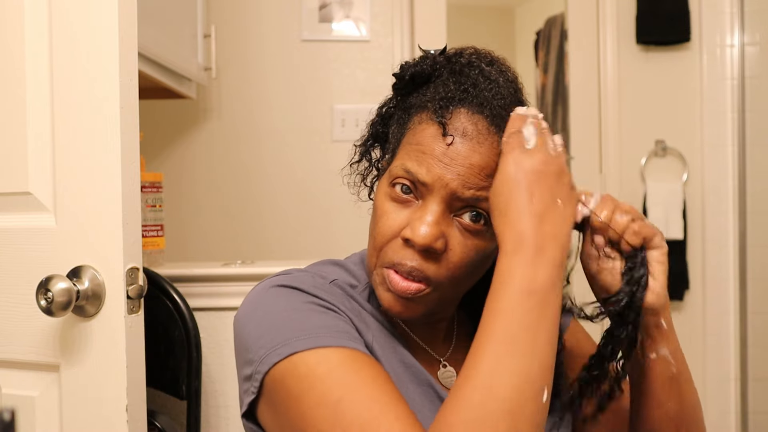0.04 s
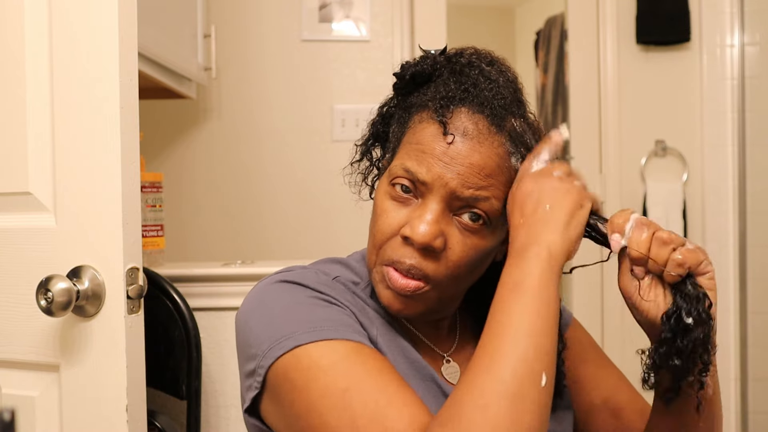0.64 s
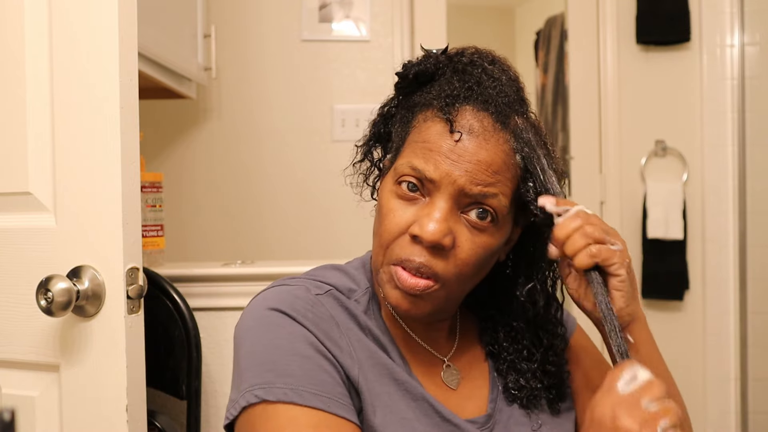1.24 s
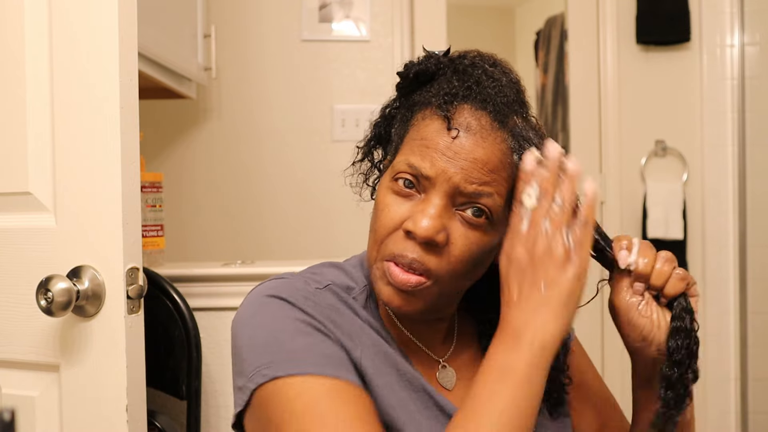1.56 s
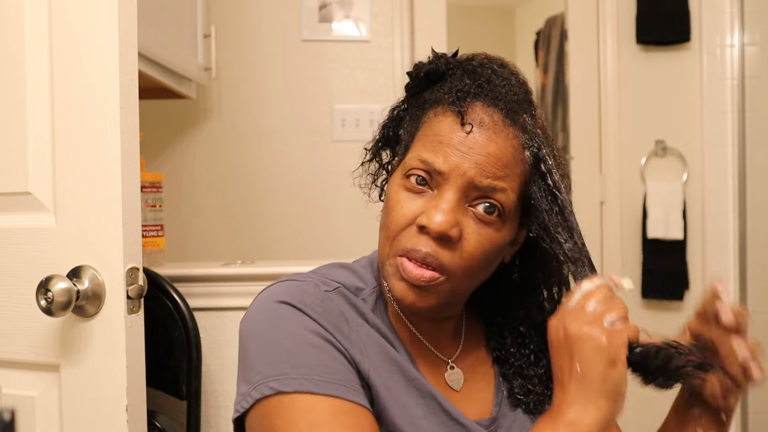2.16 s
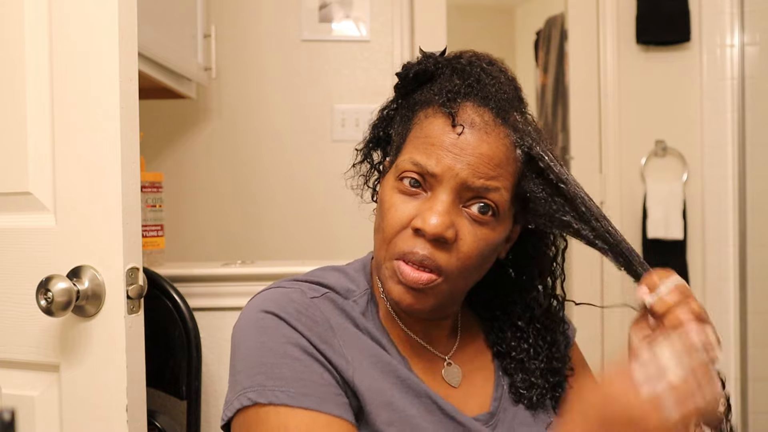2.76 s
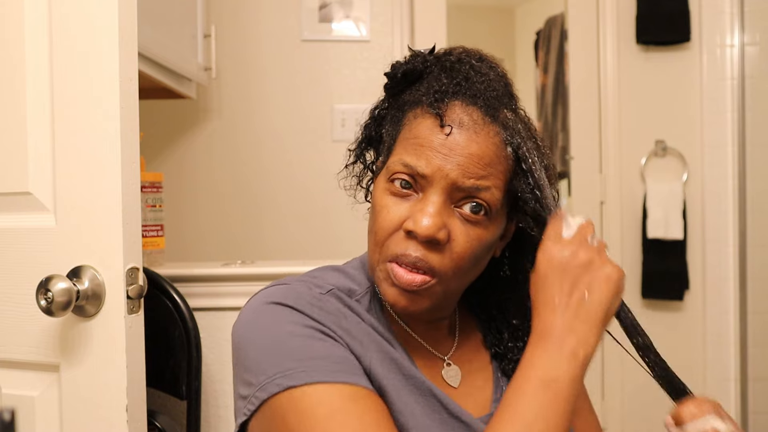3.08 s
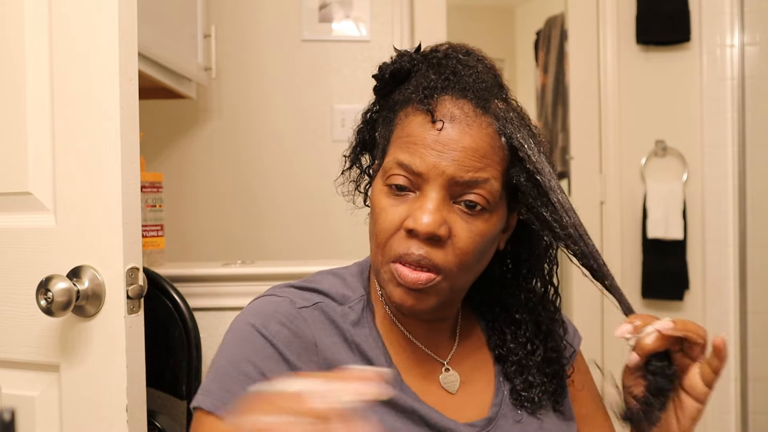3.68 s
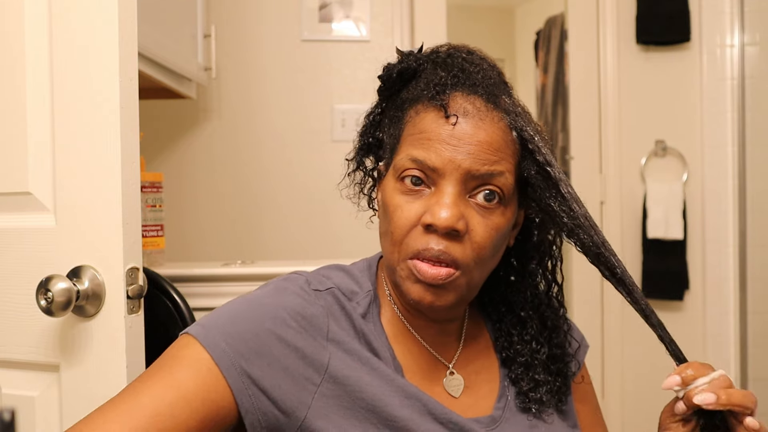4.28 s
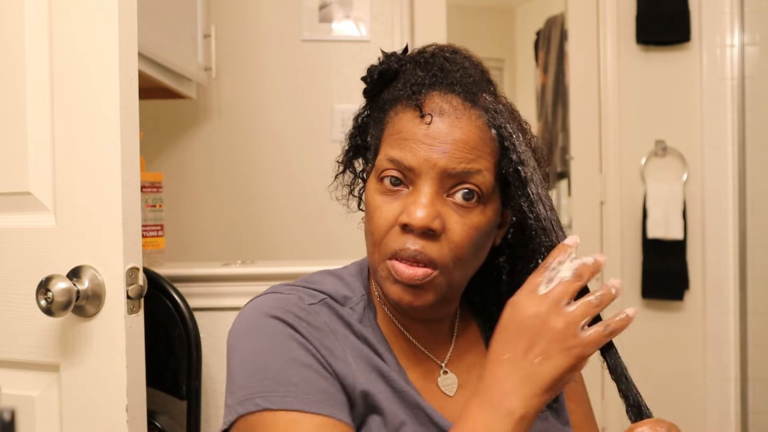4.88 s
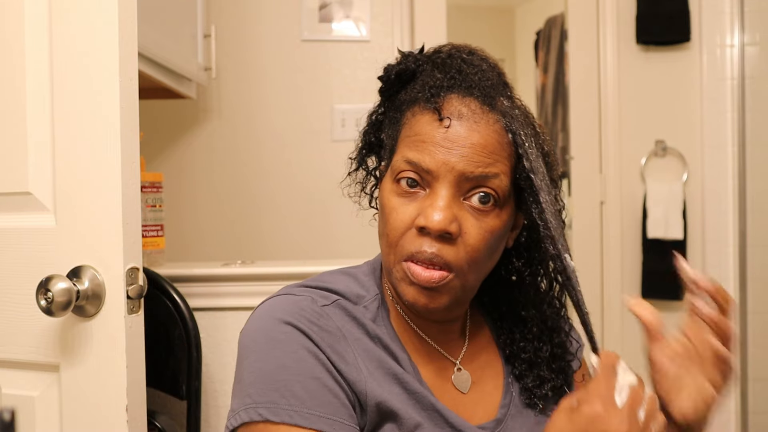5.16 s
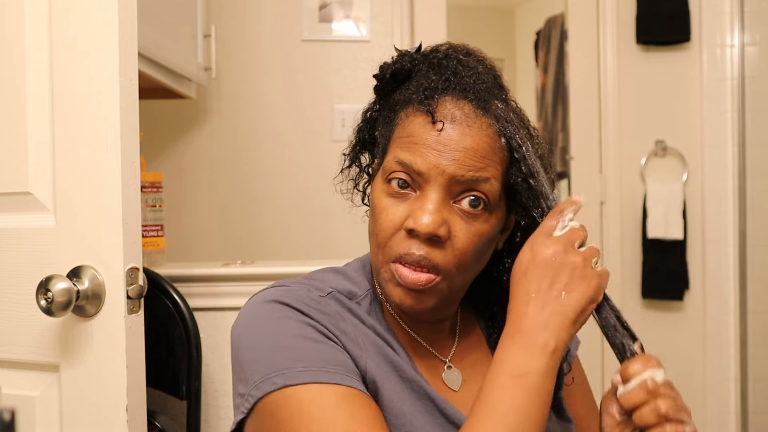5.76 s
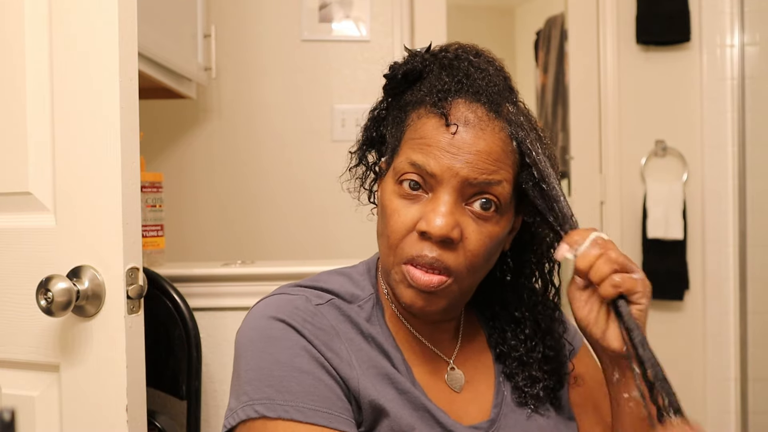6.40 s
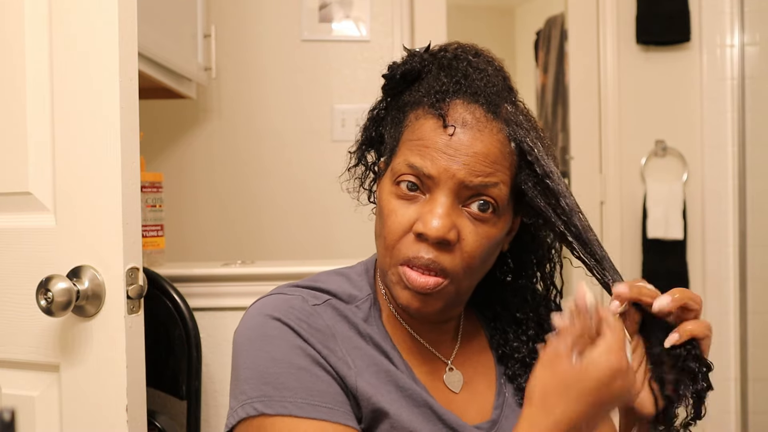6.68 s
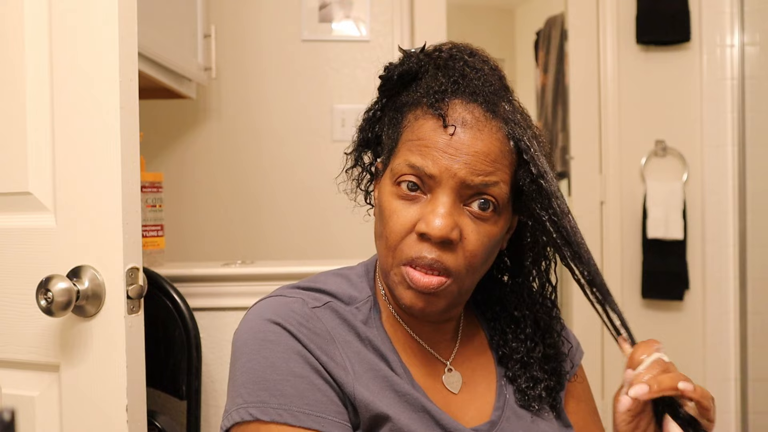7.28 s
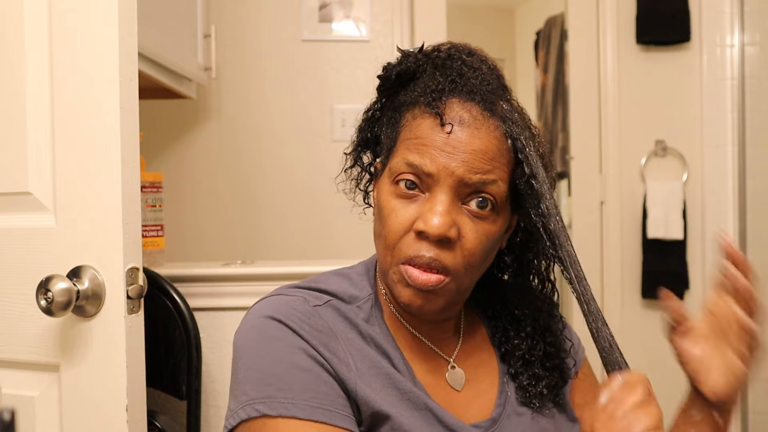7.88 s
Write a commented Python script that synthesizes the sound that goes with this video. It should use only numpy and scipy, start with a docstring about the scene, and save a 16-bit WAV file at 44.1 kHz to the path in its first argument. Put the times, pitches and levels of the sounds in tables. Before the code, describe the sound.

Soft swishes and squishes come from nearby as fingers slide down wet, cream-coated hair, now and then making a small sticky click. They ease off while a plastic container bumps the counter several times with hollow clacks and thuds, then start again. Ventilation murmurs throughout in the short echo of a small bathroom, and a faint low drone, like an engine outside, grows louder at the close.

```python
"""A small bathroom murmurs with ventilation and a faint, low drone, like an engine outside.
From the start, hands pull conditioner through wet hair: strands hiss, tiny bubbles burst, and now
and then cream snaps between the fingers or skin squeaks on the lock. At about 4 s the pulling stops
and a plastic container scrapes and knocks on the counter. After 5 s the pulling starts again,
and from about 7 s to the end the drone swells."""
import sys
import numpy as np
from scipy import signal
from scipy.fft import rfft, irfft, next_fast_len
from scipy.io import wavfile
from scipy.ndimage import map_coordinates

SR = 44100
rng = np.random.default_rng(int(sys.argv[2]) if len(sys.argv) > 2 else 0)


def file_out(sig):
    """Save sig as 16-bit WAV at sys.argv[1]."""
    # one column per channel
    cols = np.atleast_2d(sig).T
    # limit, then scale
    lim = np.clip(cols, -1, 1)
    pcm = np.round(lim * 32767).astype(np.int16)
    wavfile.write(sys.argv[1], SR, pcm)


N = 350154

# Tone of the moving air in mid (what both ears share) and side (how they differ): pitch_hz, gain_db
AIR_MID_TONE = [(20, -44), (27, 7.5), (40, -14), (70, -0.5), (100, 2), (150, -8), (270, -9), (420, -13),
                (1000, -16), (2000, -20.5), (3400, -24), (6000, -30), (12000, -44), (14500, -70)]
AIR_SIDE_TONE = [(20, -32), (100, -17), (200, -7.5), (400, -5.5), (900, -8), (1500, -10.5), (2200, -12.5),
                 (3400, -16), (6000, -21), (12000, -33), (14500, -36)]
# The drone, which holds the first row from the start: time_s, pitch_hz, level_db
DRONE_PATH = [(6.2, 68, -56.5), (6.45, 68.6, -57), (7.1, 71.15, -52), (7.16, 70.8, -44), (7.25, 76.5, -41),
              (7.3, 79.8, -50), (7.41, 82.8, -50), (7.47, 82.6, -44.5), (7.58, 84.7, -40.5),
              (7.75, 82.3, -44.5), (7.9, 80.4, -41)]

# Pulls of the fist along the hair:
# start_s, length_s, squish_db, hiss_db, hollow_pitch_hz, bubble_spread_octaves
PULLS = [(0, 0.034, -60.5, -66.5, 2900, 0.45), (0.104, 0.036, -54, -62.5, 4100, 0.14),
         (0.312, 0.018, -74, -57.5, 3020, 0.33), (0.612, 0.056, -60, -85.5, 4300, 0.14),
         (0.896, 0.1, -53, -57, 3210, 0.32), (1.063, 0.053, -51, -59, 2950, .36),
         (1.263, 0.11, -61.5, -63, 2830, 0.35), (1.434, 0.034, -54.5, -59.5, 3060, 0.34),
         (1.803, 0.13, -63.5, -63, 2660, 0.26), (2.083, 0.083, -55.5, -57, 3390, 0.3),
         (2.232, 0.083, -55.5, -59, 3430, 0.21), (2.43, 0.19, -57, -62.5, 2900, 0.23),
         (2.733, 0.11, -52.5, -60.5, 3140, 0.22), (2.9, 0.025, -54.5, -61.5, 2910, 0.3),
         (3.123, 0.11, -57.5, -64.5, 2650, 0.27), (3.246, 0.098, -51.5, -54.5, 3400, 0.36),
         (3.583, 0.032, -59.5, -58.5, 3740, 0.42), (5.154, 0.26, -59, -59.5, 3100, 0.32),
         (5.56, 0.32, -63.5, -62.5, 3420, 0.32), (6.033, 0.094, -56, -54, 3400, 0.32),
         (6.253, 0.091, -63, -65, 2700, 0.37), (6.535, 0.061, -57, -57, 3780, 0.26),
         (7.354, 0.006, -64, -58.5, 3770, 0.23), (7.843, 0.026, -50, -50, 3170, 0.21)]
# Tone of sliding strands and of smeared cream: pitch_hz, gain_db
STRAND_TONE = [(700, -17), (2000, 0.5), (4500, 0), (6500, 0.5), (8500, -1.5), (11500, 0.5), (13000, -7),
               (14500, -27)]
CREAM_TONE = [(600, -10.5), (1500, -12), (2400, -6), (4000, -6.5), (6000, -16), (10000, -30), (14000, -42)]
GRAB_DB_PER_S, RELEASE_DB_PER_S = 165, 99  # how fast a pull swells and dies away
HOLD_SQUISH_DB, HOLD_HISS_DB = -71, -66.5  # the hair shifts in the hand between pulls
PAUSE_S, PAUSE_FADE_S, PAUSE_DB = (3.95, 5.06), 0.034, -8.5  # quieter while a hand is at the counter
HISS_LEAD_S = 0.027  # the strands start to slide before the cream is squeezed

# Wet snaps between the fingers: start_s, level_db, treble_limit_hz
CREAM_SNAPS = [(0.18, -42, 6000), (1.095, -42, 4900), (6.8836, -32, 12000), (7.2451, -38.5, 3240)]
# Tone of a snap's click: pitch_hz, gain_db
SNAP_TONE = [(1000, -17), (2200, -8), (2800, -2), (5200, -6.5), (6200, -11), (11500, -9.5), (14500, -34)]
# Ringing of the gap between the fingers (fade_s is the time to drop 60 dB): pitch_hz, gain_db, fade_s
FINGER_GAP_NOTES = [(2970, -8.5, 0.014), (4950, -7, 0.007)]
# Crushed foam, and skin rubs from dull thrum to thin squeak: peak_s, half_length_s, pitch_hz, level_db
FOAM_FIZZES = [(.3, 0.046, 11160, -61.5), (7.36, 0.015, 11300, -63)]
SKIN_RUBS = [(1.445, 0.04, 2520, -61.5), (2.48, 0.089, 231.3, -62.5), (3.13, 0.028, 2450, -61.5),
             (5.38, 0.029, 3950, -63), (5.63, 0.055, 2850, -58.5), (5.64, 0.04, 4020, -65),
             (5.7, 0.15, 256, -63.5), (5.81, 0.088, 2740, -62.5), (6.57, 0.057, 2670, -59),
             (7.345, 0.0098, 3800, -56.5)]

# The container meets the counter (levels are relative, within each column):
# start_s, thud_db, shell_db, crack_db, contact_s, flatness_0_to_1
CONTAINER_KNOCKS = [(3.987, -50, -49, -40, 0.0084, 0), (3.999, -22, -32, -41, 0.0051, 0),
                    (4.011, -34, -30, -43, 0.0016, 0.1), (4.1028, -21.5, -25, -37.5, 0.00091, 0),
                    (4.358, -43, -21, -48, 0.0023, 0.04), (4.3702, -14.5, -23, -25, 0.0015, 0.93),
                    (4.378, -53, -31, -36, 0.0037, 0.04), (4.4145, -39, -22, -44, 0.0022, 0.03),
                    (4.4408, -44, -38, -35, 0.0043, 0), (4.4981, -17, -22, -42, 0.0018, 0.07)]
# Tone of a knock's sharp crack: pitch_hz, gain_db
CRACK_TONE = [(60, 10), (300, 19), (700, 7), (2200, 8), (4200, -1.5), (8000, -10.5), (11500, -10),
              (14500, -30)]
# Ringing of the plastic shell, its rim and the counter: pitch_hz, gain_db, fade_s
SHELL_NOTES = [(855, -6, 0.018), (1040, -5.5, 0.015), (1430, -5, 0.021), (2500, -8, 0.019)]
RIM_NOTES = [(2523, 17, 0.063), (3750, -5, 0.04)]
COUNTER_NOTES = [(104.9, -3, 0.28), (133.6, -8.5, 0.36), (183, -19.5, 0.33), (280, -5, 0.11),
                 (362, -13.5, 0.17), (468, -11.5, 0.16), (551, -13, 0.34)]
# A flat landing also claps the container's base and shoves the counter top: pitch_hz, gain_db, fade_s
BASE_NOTES = [(1036, -21.5, 0.039), (1270, -20.5, 0.021), (2450, -27.5, 0.028)]
SHOVE_NOTES = [(111, -16, 0.035), (284, -18.5, 0.06)]

# How long the bathroom echoes: pitch_hz, fade_s
ECHO_TIMES = [(100, 0.76), (500, 0.36), (2500, 0.38), (6000, 0.28), (13000, 0.28)]
# Stereo width, narrow in the bass and wide in the treble: pitch_hz, side_gain_db
STEREO_WIDTH = [(60, -37), (130, -21), (300, -5), (600, -3), (1200, 4), (2500, 2.5), (4500, 5.5),
                (8000, 6.5)]
TOP_HZ = 14800


def amp(db):
    """Turn decibels into a gain."""
    return 10 ** (np.asarray(db) / 20)


def unit(x):
    """Scale a sound to an average power of one."""
    return x / np.sqrt(np.mean(x ** 2, axis=-1, keepdims=True) + 1e-20)


def at_pitch(points, hz):
    """Read between (pitch_hz, value) points on a log scale."""
    pitches, values = np.transpose(points)
    return np.interp(np.log(hz + 1), np.log(pitches + 1), values)


def curves(rows):
    """One value per sample for each column after the time."""
    times, *columns = np.transpose(rows)
    return [np.interp(np.arange(N) / SR, times, column) for column in columns]


def wobble(rate):
    """A smooth curve through rate random points a second."""
    steps = np.arange(0, N + 64, 64)
    points = rng.standard_normal(int(N * rate / SR) + 4)
    return np.interp(np.arange(N), steps, map_coordinates(points, [steps * rate / SR]))


def filtered(x, response):
    """Give each pitch the gain response(hz)."""
    size = x.shape[-1]
    padded = next_fast_len(size + SR // 4)
    return irfft(rfft(x, padded) * response(np.fft.rfftfreq(padded, 1 / SR)), padded)[..., :size]


def coloured(x, tone):
    """Shape a sound with a (pitch_hz, gain_db) table."""
    return filtered(x, lambda hz: amp(at_pitch(tone, hz)))


def add(track, start_s, sound):
    """Lay a sound into a track."""
    part = track[round(start_s * SR):][:len(sound)]
    part += sound[:len(part)]


def ventilation(mid_db=-52, side_db=-51.0, whine_db=-72, whine_hz=3370):
    """Air moves steadily, with a faint, unsteady whine: mid and side."""
    mid = amp(mid_db) * unit(coloured(rng.standard_normal(N), AIR_MID_TONE))
    side = amp(side_db) * unit(coloured(rng.standard_normal(N), AIR_SIDE_TONE))
    whine_gain = amp(whine_db + 0.96 * wobble(2.7))
    whine = whine_gain * np.sin(2 * np.pi * np.cumsum(whine_hz + 6 * wobble(40)) / SR)
    return np.array([mid + whine, side])


def drone(upper_db=-12, rumble_db=-9, upper_ratio=1.4):
    """A low, wavering engine note comes through the walls with a rough rumble above it."""
    pitch, db = curves(DRONE_PATH)
    phase = 2 * np.pi * np.cumsum(pitch * (1 + 0.02 * wobble(9.8))) / SR
    rumble_tone = [(60, -47), (105, -23.0), (135, 3.5), (170, -45), (400, -27), (2000, -92)]
    rumble = unit(coloured(rng.standard_normal(N), rumble_tone))
    upper = amp(upper_db + 1.5 * wobble(4.8)) * np.sin(upper_ratio * phase)
    note = np.sqrt(2) * (np.sin(phase) + upper)
    return amp(db + 0.52 * wobble(12.0)) * (note + amp(rumble_db) * rumble)


def pulls():
    """Each pull swells, holds and lets go: curves of squish, hiss, bubble pitch and bubble spread."""
    t = np.arange(0, N + 64, 64) / SR
    start, length, squish_db, hiss_db, hz, octaves = np.transpose(PULLS)[:, :, None]
    release_db = RELEASE_DB_PER_S * np.maximum(t - start - length, 0)
    squeezes = amp(squish_db - GRAB_DB_PER_S * np.maximum(start - t, 0) - release_db)
    slides = amp(hiss_db - GRAB_DB_PER_S * np.maximum(start - HISS_LEAD_S - t, 0) - release_db)
    into_pause_s = np.minimum(t - PAUSE_S[0], PAUSE_S[1] - t)
    dip_db = PAUSE_DB * np.clip(into_pause_s / PAUSE_FADE_S + .5, 0, 1)
    squish = np.hypot(np.linalg.norm(squeezes, axis=0), amp(HOLD_SQUISH_DB + dip_db))
    hiss = np.hypot(np.linalg.norm(slides, axis=0), amp(HOLD_HISS_DB + dip_db))
    hollow_hz = np.average(hz * np.ones_like(t), axis=0, weights=squeezes ** 2)
    spread = np.average(octaves * np.ones_like(t), axis=0, weights=squeezes ** 2)
    return curves(np.transpose([t, squish, hiss, hollow_hz, spread]))


def crackle(per_s, spread_db, smooth):
    """Tiny ticks of random size over smooth rubbing noise."""
    ticks = (rng.random(N) < per_s / SR) * rng.choice([-1, 1], N)
    sizes = amp(spread_db * np.clip(rng.standard_normal(N), -2, 2))
    return unit(unit(ticks * sizes) + smooth * rng.standard_normal(N))


def bubbles(hollow_hz, spread_octaves, per_s, cycles, spread_db):
    """Tiny bubbles burst at random; each rings briefly near the pitch of the fist's hollow."""
    starts = np.flatnonzero(rng.random(N) < per_s / SR)
    detune, size, life = np.clip(rng.standard_normal((len(starts), 3)), -2.2, 2.2).T[:, :, None]
    age = np.arange(SR // 80)
    turns = hollow_hz[starts, None] * 2 ** (spread_octaves[starts, None] * detune) * age / SR
    fade = np.exp(-turns / (cycles * np.exp(.5 * life)))
    pops = amp(spread_db * size) * fade * np.sin(2 * np.pi * turns)
    return unit(np.bincount((starts[:, None] + age).ravel(), pops.ravel(), N)[:N])


def hair(hiss_boost_db=1, smear_db=-6, flutter_db=1.34):
    """Strands hiss through the fist while cream bubbles burst in its hollow, pitched by the grip."""
    squish, hiss, hollow_hz, spread = pulls()
    hiss = amp(hiss_boost_db) * hiss
    strands = unit(coloured(crackle(per_s=3000, spread_db=2.0, smooth=0.59), STRAND_TONE))
    foam = bubbles(hollow_hz, spread, per_s=800, cycles=5, spread_db=4)
    smear = unit(coloured(crackle(per_s=1400, spread_db=0.5, smooth=0.8), CREAM_TONE))
    cream = unit(foam + amp(smear_db) * smear)
    effort = np.hypot(squish, hiss)
    blend = (squish * cream + hiss * strands) / effort
    texture = unit(room(blend, echo_db=-1.5, side_db=-14.5, changes=48))
    return effort * amp(flutter_db * wobble(30)) * texture


def room(x, echo_db, side_db, changes=12):
    """Close, hard walls add a dense echo that changes as the hands move: mid and side."""
    echoes, step = np.zeros((2, N)), N // changes
    for centre in np.arange(changes + 1) * step:
        span = np.arange(max(centre - step, 0), min(centre + step, N))
        if not x[span].any():
            continue
        hz, t, noise = signal.stft(rng.standard_normal((2, SR // 4)), SR, nperseg=256)
        fade = amp(-60 * t / at_pitch(ECHO_TIMES, hz)[:, None])
        tail = signal.istft(noise * fade * (1 - np.exp(-t / 0.00049)), SR, nperseg=256)[1]
        tail *= amp(echo_db) / np.linalg.norm(tail[0])
        piece = x[span] * np.cos(np.pi / 2 * (span - centre) / step)
        for track, echo in zip(echoes, signal.fftconvolve(piece[None], tail, axes=1)):
            add(track, span[0] / SR, echo)
    return echoes + [x, -amp(side_db) * x]  # the direct sound comes from slightly right


def burst(t, life_s):
    """A short rush of tiny contacts, equally strong at every pitch."""
    rush = rng.standard_normal(len(t)) * np.sqrt(t / life_s) * np.exp(-t / life_s)
    spectrum = rfft(rush, 2 * len(t))
    return irfft(spectrum / (np.abs(spectrum) + 1e-20))[:len(t)]


def ring(notes, t, soft_hz=6000, scatter_db=1.5, sign=-1):
    """A struck thing rings with fading notes; a soft touch weakens those above soft_hz."""
    sound = np.zeros(len(t))
    for k, (hz, db, fade_s) in enumerate(notes):
        gain = amp(db + scatter_db * rng.standard_normal() - 60 * t / fade_s)
        gain /= np.hypot(1, (hz / soft_hz) ** 2)
        sound += sign ** k * gain * np.sin(2 * np.pi * hz * t)  # sign=1: struck at the centre
    return sound


def cream_snaps(life_s=0.00089):
    """A film of cream parts between the fingers with one click that rings briefly in the gap."""
    track, t = np.zeros(N), np.arange(SR // 20) / SR
    for start, db, top_hz in CREAM_SNAPS:
        click = coloured(burst(t, life_s), SNAP_TONE)
        click = filtered(click, lambda hz: 1 / np.hypot(1, (hz / top_hz) ** 4))
        add(track, start, amp(db) * (click / np.abs(click).max() + ring(FINGER_GAP_NOTES, t, top_hz)))
    return room(track, echo_db=0.5, side_db=-11)


def swells(rows, width, sag_octaves_per_s=0):
    """Bands of noise swell and fade; width is a share of their pitch."""
    track, t = np.zeros(N), np.arange(SR // 2) / SR
    for peak_s, half_length_s, hz, db in rows:
        start = max(peak_s - t.mean(), 0)
        since_peak = start + t - peak_s
        noise = filtered(rng.standard_normal((2, len(t))), lambda f: np.exp(-.5 * (f / hz / width) ** 2))
        phase = 2 * np.pi * np.cumsum(hz * 2 ** (-sag_octaves_per_s * since_peak)) / SR
        band = unit(noise[0] * np.cos(phase) + noise[1] * np.sin(phase))
        add(track, start, amp(db) * band * np.exp(-.5 * (since_peak / half_length_s) ** 2))
    return track


def fingers():
    """Crushed foam fizzes, and skin rubs on the taut hair, each rub sinking as the hand slides down."""
    fizz = swells(FOAM_FIZZES, width=0.17)
    rubbing = swells(SKIN_RUBS, width=0.096, sag_octaves_per_s=0.42)
    return room(fizz + rubbing, echo_db=-2.5, side_db=-8)


def container(thud_gain_db=-2, shell_gain_db=-6, crack_gain_db=4, rim_db=-5,
              thud_lag_s=0.00118, shove_lag_s=0.0058, lowest_hz=65, soft_hz=185, hard_hz=330):
    """Each knock cracks, rings the plastic shell and thuds through the counter."""
    thuds, clacks = np.zeros(N), np.zeros(N)
    t, long_t = np.arange(SR // 10) / SR, np.arange(SR // 3) / SR
    thud_rise = 1 - np.exp(-long_t / 0.0053)
    for start, thud_db, shell_db, crack_db, contact_s, flatness in CONTAINER_KNOCKS:
        grit = burst(t, contact_s)
        scrape = min(contact_s / .01, 1)  # long contacts scrape and make the rim sing
        push = np.sqrt(scrape) * grit
        push[0] += 1 - scrape  # short ones are mostly a clean tap
        plastic = ring(SHELL_NOTES, t) + scrape ** 2 * amp(rim_db) * ring(RIM_NOTES, t)
        add(clacks, start, amp(shell_db + shell_gain_db) * signal.fftconvolve(push, plastic))
        crack = coloured(grit, CRACK_TONE)
        add(clacks, start, amp(crack_db + crack_gain_db) * crack / np.abs(crack).max())
        # a flat landing claps and thuds harder
        add(thuds, start + thud_lag_s, flatness * ring(BASE_NOTES, t))
        add(thuds, start + shove_lag_s, flatness * ring(SHOVE_NOTES, t, sign=1))
        counter = ring(COUNTER_NOTES, long_t, soft_hz + flatness * (hard_hz - soft_hz))
        add(thuds, start + thud_lag_s, amp(thud_db + thud_gain_db) * counter * thud_rise)
    thuds = signal.sosfilt(signal.butter(2, lowest_hz, 'highpass', fs=SR, output='sos'), thuds)
    return room(clacks, echo_db=-2.0, side_db=-43) + [thuds, .25 * thuds]  # thuds are nearly mono


def scene():
    """Mix all the sounds as mid and side, then turn them into left and right."""
    air_mid, air_side = ventilation()
    background = air_mid + drone()
    mid, side = hair() + cream_snaps() + fingers() + container()
    mid = mid + background
    side = coloured(side, STEREO_WIDTH) + air_side
    return np.array([mid + side, mid - side])


def record(dry):
    """Cut away the treble above TOP_HZ."""
    return filtered(dry, lambda hz: hz < TOP_HZ)


dry = scene()
out = record(dry)
file_out(out)
```